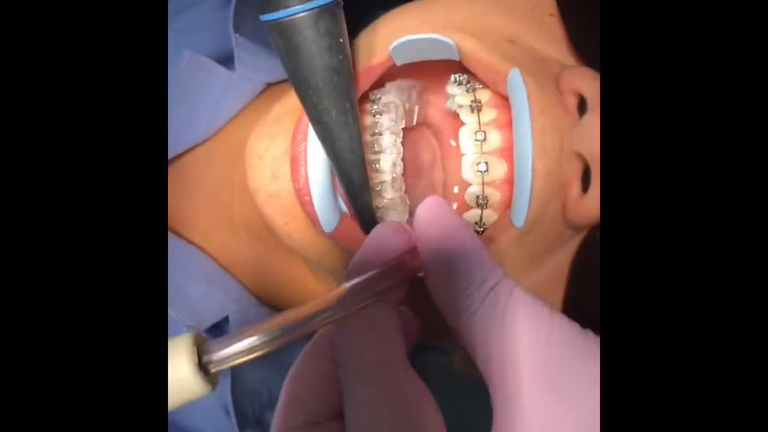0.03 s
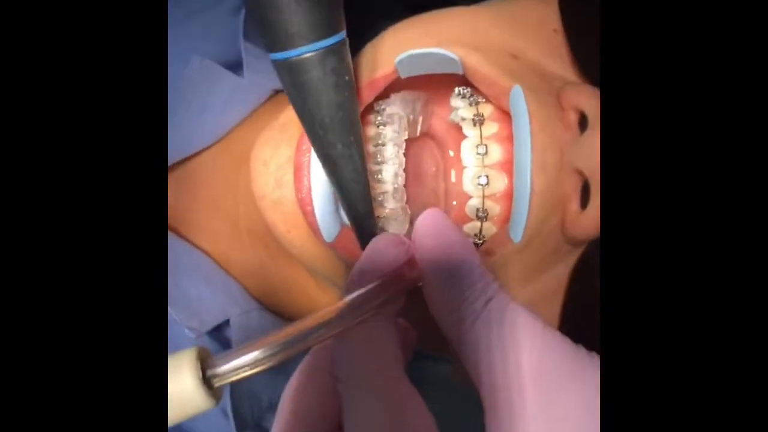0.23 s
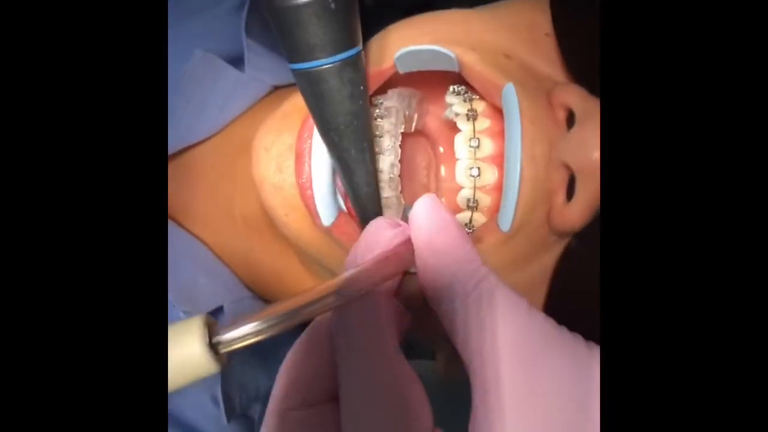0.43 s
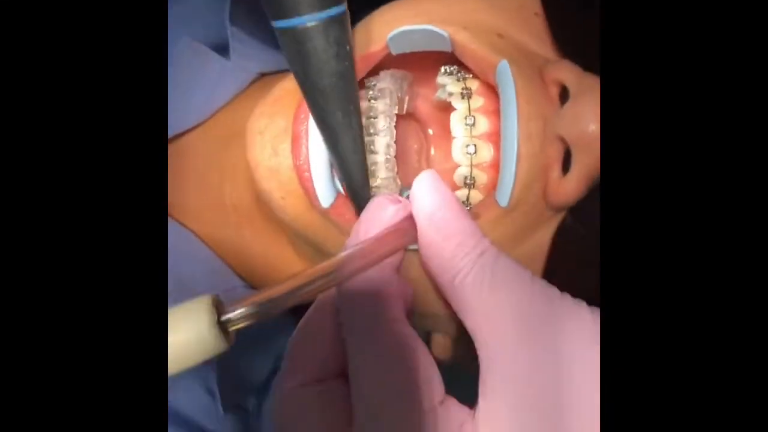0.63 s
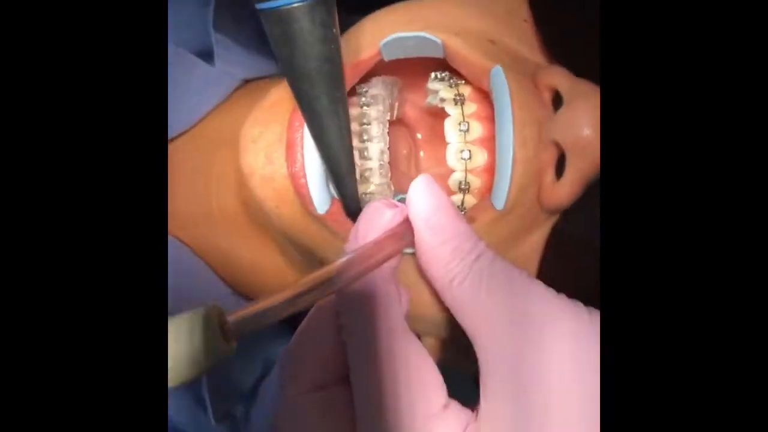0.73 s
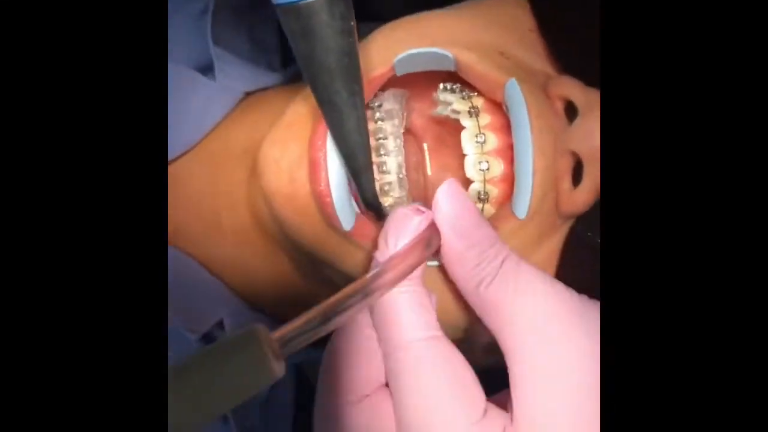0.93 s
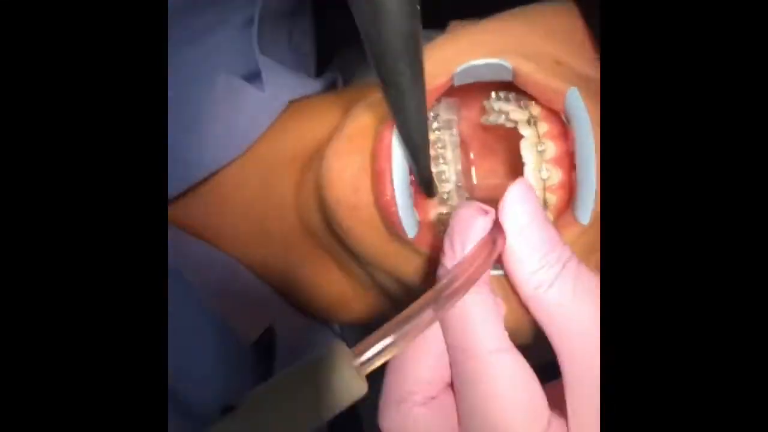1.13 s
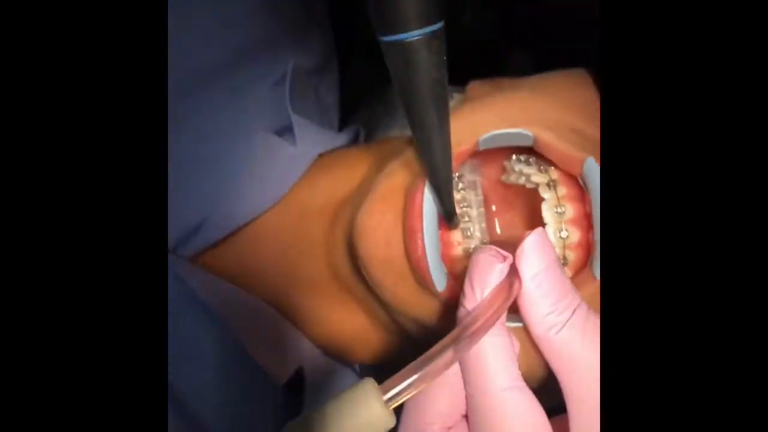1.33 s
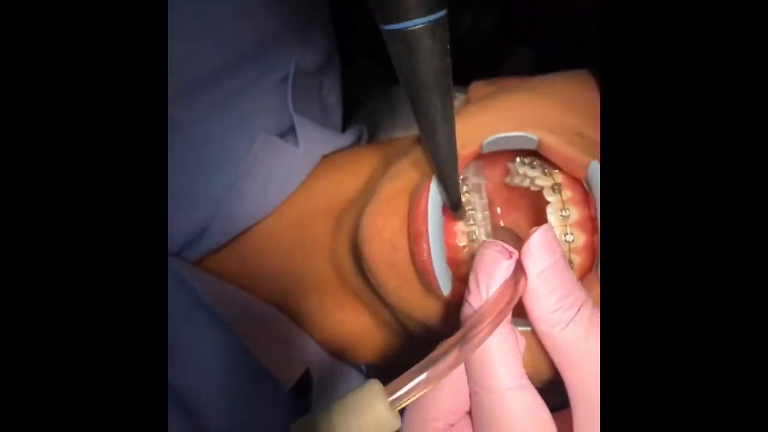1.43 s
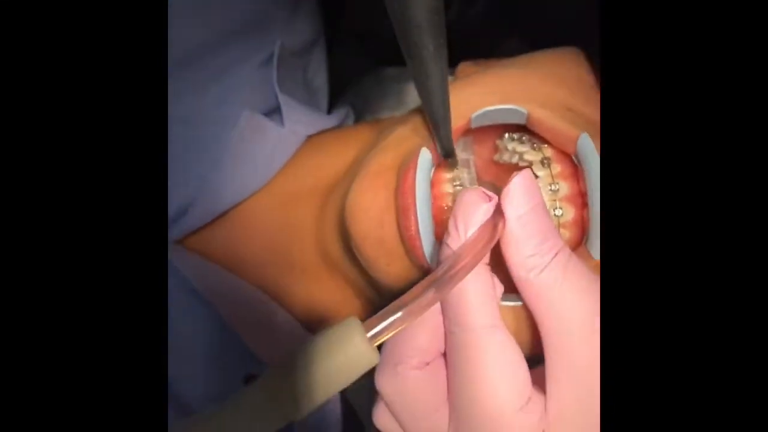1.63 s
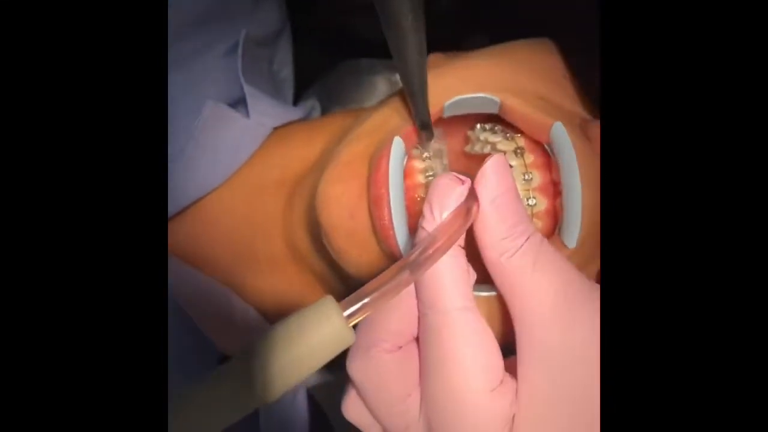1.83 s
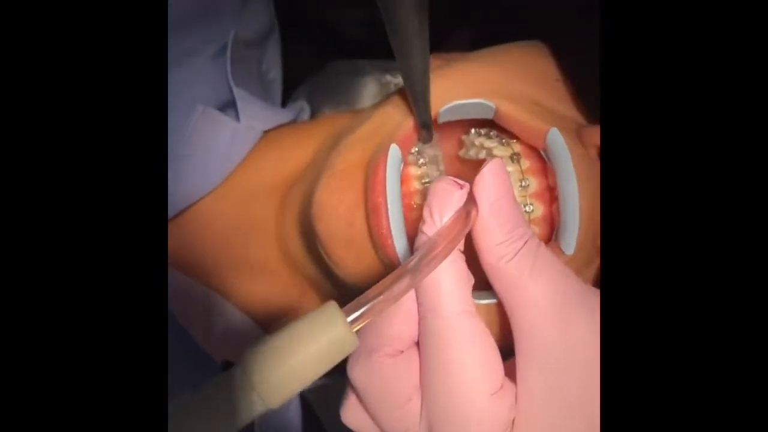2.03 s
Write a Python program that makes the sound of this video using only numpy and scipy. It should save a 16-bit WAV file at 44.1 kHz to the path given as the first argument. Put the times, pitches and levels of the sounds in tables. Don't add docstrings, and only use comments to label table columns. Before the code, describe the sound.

A wide dental suction tube hisses strongly from 0 to 1.1 s, hollow and ringing near 1 kHz, roughened by water spatter and brief singing chirps, notably around 0.3-0.5 and 0.7 s. A high edge whistle swells until 1.14 s, then wet pops at 1.16-1.24 s. The rush sinks, faintest near 1.6 s, then returns softer and duller-toned with small chirps to 2 s. Thin steady hiss and faint pump hum continue beneath.

```python
import sys
import numpy as np
from scipy import signal
from scipy.fft import rfft, irfft
from scipy.io import wavfile
from scipy.ndimage import uniform_filter1d

SR = 44100
rng = np.random.default_rng(int(sys.argv[2]) if len(sys.argv) > 2 else 0)


def linear_from_db(decibels):
    return 10 ** (np.asarray(decibels, float) / 20)


def master_out(mix):
    frames = np.transpose(np.atleast_2d(mix))
    ceiling = np.clip(frames, -1, 1)
    pcm = np.round(ceiling * 32767).astype(np.int16)
    wavfile.write(sys.argv[1], SR, pcm)


N = 92213

# pitch_hz, wander_hz, level_db
PUMP_TONES = [(49.2, 1.2, -43), (73.6, 1.95, -43.5), (98.9, 2.32, -43), (223.2, 11.76, -49.5)]
# pitch_hz, density_db (per Hz)
VENTILATION_SPECTRUM = [(12, -35), (20, -9), (43, -4.5), (80, -7.5), (146, -6.5), (222, -7.5), (399, -11.5),
                        (536, -18.5), (800, -12), (1040, -20), (1760, -120)]
# pitch_hz, density_db (per Hz)
EJECTOR_SPECTRUM = [(820, -30), (1400, -14.5), (2390, -10), (3070, -8), (3710, -7), (5280, -5.5),
                    (9760, -7.5), (10600, -1.5), (15500, -13)]
# start_s, level_db, pitch_hz, decay_s
WET_POPS = [
    (1.158, -31, 1760, 0.0011),
    (1.191, -28.5, 532, 0.0021),
    (1.242, -43, 1730, 0.0017),
    (1.409, -40, 1130, 0.002),
]
# rise_s, pitch_hz, width_hz, level_db
EDGE_WHISTLE = (0.5, 9552, 550, -28)
# time_s, level_db, tube_tone_db, angle (share of the second tip angle, 0-1)
AIRFLOW = [(0, -25.5, -1.5, 0.2), (.04, -20, 3.5, 0), (.11, -22, 0, 0.15), (.22, -23, 1, 0.02),
           (.29, -19, 2, 0), (.35, -20.5, 1, 0.08), (.548, -20, -0.5, 0.26), (0.574, -16, -2, 0.4),
           (.595, -21.5, 2.5, 0.02), (.7, -20, -2.5, 0.2), (.8, -20, -1, 0.15), (1.1, -20.5, -2, 0.2),
           (1.15, -23, -4.5, 0.04), (1.225, -30, 2.5, 0.37), (1.585, -40, 5.5, 0.3), (1.619, -30, 3, 0.96),
           (1.88, -28, -1.5, .95), (2.09, -31, 0.5, 0.54)]
# pitch_hz, width_hz, first_angle_db, second_angle_db
TUBE_TONE = [(1050, 74.4, -2.5, -5), (1096, 91, -3.5, -7.5), (1164, 71, -8.5, -5), (1606, 88, -17, -19)]
# pitch_hz, width_hz, first_angle_db, second_angle_db
MOUTH_RESONANCES = [(2350, 770, -15, -24.5), (2696, 110, -10.5, -10), (2910, 487, -7, -7.5),
                    (3253, 170, -14, -14), (4300, 640, -24, -5), (4840, 288, -5.5, -13),
                    (5280, 730, -7, -14.5), (6570, 870, -8.5, -18), (7090, 1230, -8, -11),
                    (8410, 640, -17, -19), (9670, 1170, -19.5, -13.5), (10950, 1200, -15.5, -11),
                    (13600, 1300, -18, -12), (15000, 800, -12, -19)]
# centre_s, level_db (over the tube tone), pitch_hz, half_length_s
WATER_SURGES = [(0.057, 4, 1090, 0.014), (0.301, 9, 1060, 0.012), (0.384, 7, 1044, 0.021),
                (0.466, 10, 1057, 0.0091), (0.508, 9, 1058, 0.011), (.7, 14.5, 1053, 0.009),
                (0.722, 15, 1090, 0.0046), (1.08, 4, 1100, 0.022), (1.265, 12.5, 1130, 0.0035),
                (1.286, 11.5, 1138, 0.0049), (1.381, 9.5, 1100, 0.005), (1.751, 8.5, 1038, 0.0052),
                (1.795, 13, 1150, 0.0037), (1.923, 8.5, 1013, 0.0071)]
# pitch_hz, width_hz, depth_bias (0-1 is none to full, before a random
TREBLE_NOTCHES = [(8850, 130, .1), (9900, 130, -.5), (10350, 150, .1), (11450, 130, -.2),
                  (11950, 130, -.1), (12700, 170, .1), (13200, 150, -.1), (13600, 150, 0),
                  (14000, 170, .2), (14650, 200, .3), (15050, 200, .3), (15600, 200, .2)]
# pitch_hz, width_hz, depth (0-1)
PORT_DIPS = [(8820, 500, 0.38), (10420, 190, 0.73), (12300, 730, 0), (15100, 610, 0.5)]


def ring(x, pitch_hz, width_hz):
    b, a = signal.iirpeak(pitch_hz, pitch_hz / max(width_hz, 1), fs=SR)
    return signal.lfilter(b, a, x)


def unit(x):
    return x / np.sqrt(np.mean(x ** 2))


def walk(rate_hz):
    hold = int(SR / rate_hz)
    drift = np.repeat(rng.standard_normal(N // hold + 1), hold)
    drift = uniform_filter1d(uniform_filter1d(drift, hold), hold)[:N]
    return (drift - drift.mean()) / drift.std()


def coloured(spectrum):
    pitch_hz, density_db = np.array(spectrum).T
    f = np.maximum(np.fft.rfftfreq(N, 1 / SR), 1)
    shape_db = np.interp(np.log(f), np.log(pitch_hz), density_db, left=-60, right=density_db[-1])
    return unit(irfft(rfft(rng.standard_normal(N)) * linear_from_db(shape_db), N))


def blown(gust, pitch_hz, width_hz):
    eddies = gust * rng.standard_normal(N)
    once = ring(eddies, pitch_hz, 2.1 * width_hz)
    return unit(ring(once, pitch_hz, 2.1 * width_hz))


def room():
    hum = 0
    for pitch_hz, wander_hz, level_db in PUMP_TONES:
        phase = 2 * np.pi * np.cumsum(pitch_hz + wander_hz * walk(5)) / SR
        hum = hum + linear_from_db(level_db + 2.5 * walk(11.78)) * np.sin(phase)
    low_pass = signal.butter(2, 900, fs=SR, output="sos")
    return hum + linear_from_db(-42) * signal.sosfilt(low_pass, coloured(VENTILATION_SPECTRUM))


def saliva_ejector():
    return linear_from_db(-34.5 + 1.5 * walk(10)) * coloured(EJECTOR_SPECTRUM)


def wet_pops(t):
    crack_db, crack_decay_s, crack_hz = 6, 0.002, 1450
    out = 0
    for start_s, level_db, pitch_hz, decay_s in WET_POPS:
        age = np.maximum(t - start_s, 0)
        soft_edge = np.e * age / decay_s * np.exp(-age / decay_s)
        tone = soft_edge * np.sin(2 * np.pi * pitch_hz * age)
        crack = np.exp(-age / crack_decay_s) * np.sin(2 * np.pi * crack_hz * age)
        out = out + linear_from_db(level_db) * (tone + linear_from_db(crack_db) * crack)
    return out


def edge_whistle(t):
    peak_s, fall_s = 1.14, 0.022
    rise_s, pitch_hz, width_hz, level_db = EDGE_WHISTLE
    swell = np.exp(-np.abs(t - peak_s) / np.where(t < peak_s, rise_s, fall_s))
    return linear_from_db(level_db + 1.2 * walk(38.7)) * swell * blown(1, pitch_hz, width_hz)


def air_rush():
    drops_per_s, drop_spread_db, drop_db, drop_decay_s = 700, 3.5, -24.5, 0.0017
    drop_size = linear_from_db(drop_spread_db * rng.exponential(size=N))
    hits = (rng.random(N) < drops_per_s / SR) * drop_size
    spatter = signal.lfilter([1], [1, -np.exp(-1 / (drop_decay_s * SR))], hits)
    return (1 + linear_from_db(drop_db) * spatter) * linear_from_db(0.5 * walk(9.1))


def water_surges(t, tube):
    for centre_s, level_db, pitch_hz, half_length_s in WATER_SURGES:
        swell = np.exp(-((t - centre_s) / half_length_s) ** 2)
        song = linear_from_db(level_db) * swell * np.sin(2 * np.pi * pitch_hz * t)
        tube = tube * (1 - 0.46 * swell) + song
    return tube


def suction_tube(t):
    time_s, level_db, tube_tone_db, angle = np.array(AIRFLOW).T
    level_db = np.interp(t, time_s, level_db)
    tube_tone_db = np.interp(t, time_s, tube_tone_db)
    angle = np.interp(t, time_s, np.clip(angle, 0, 1))
    gust = air_rush()

    tube = 0
    for pitch_hz, width_hz, first_db, second_db in TUBE_TONE:
        tone_db = first_db + angle * (second_db - first_db)
        tube = tube + linear_from_db(tone_db) * blown(gust, pitch_hz, width_hz)
    out = water_surges(t, tube) * linear_from_db(tube_tone_db - 7 + 0.47 * walk(23.86))

    waver = walk(8)
    for pitch_hz, width_hz, first_db, second_db in MOUTH_RESONANCES:
        waver = (waver + walk(7.83)) / np.sqrt(2)
        angle_db = first_db + angle * (second_db - first_db)
        flicker_db = 0.5 * waver + 0.7 * walk(30.16)
        out = out + linear_from_db(angle_db + flicker_db) * blown(gust, pitch_hz, width_hz)
    return out * linear_from_db(level_db)


def drifting_notches(x):
    f, spectrum = np.fft.rfftfreq(N, 1 / SR), rfft(x)
    for pitch_hz, width_hz, depth_bias in TREBLE_NOTCHES:
        band = irfft(spectrum * np.exp(-((f - pitch_hz) / (width_hz / 2)) ** 6), N)
        depth = np.clip(depth_bias + 0.7 * walk(8), 0, 1)
        x = x - depth * band
    return x


def scene():
    t = np.arange(N) / SR
    mouth = saliva_ejector() + wet_pops(t) + edge_whistle(t) + suction_tube(t)
    mono = room() + drifting_notches(mouth)
    return np.array([mono, mono])


def top_cut(x):
    return signal.sosfilt(signal.butter(12, 15730, fs=SR, output="sos"), x)


def record(dry):
    mix = dry
    for pitch_hz, width_hz, depth in PORT_DIPS:
        mix = mix - min(depth, 1) * ring(mix, pitch_hz, width_hz)
    return top_cut(mix)


dry = scene()
out = record(dry)
master_out(out)
```